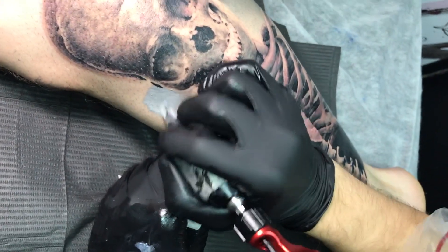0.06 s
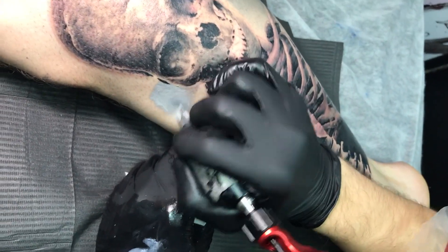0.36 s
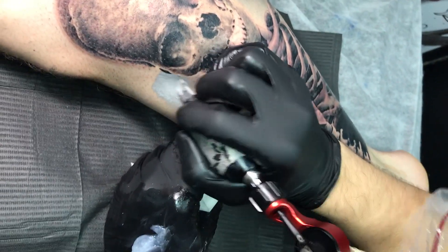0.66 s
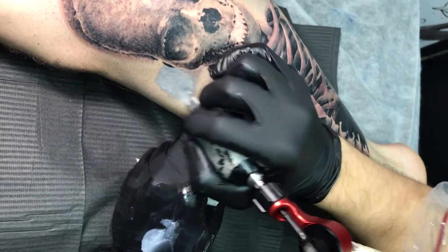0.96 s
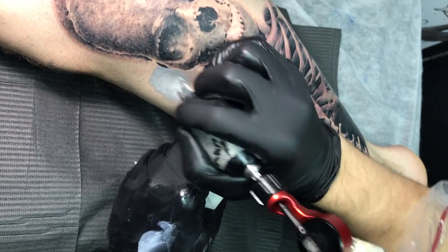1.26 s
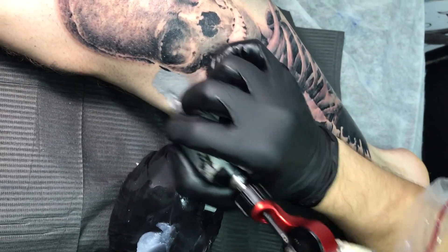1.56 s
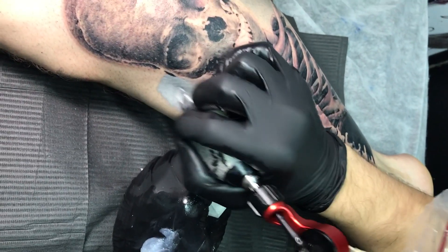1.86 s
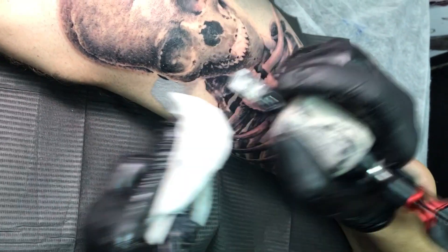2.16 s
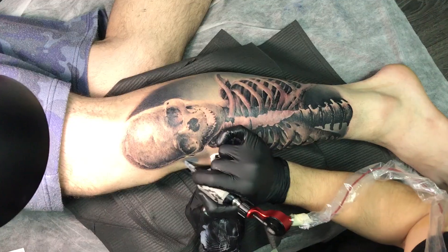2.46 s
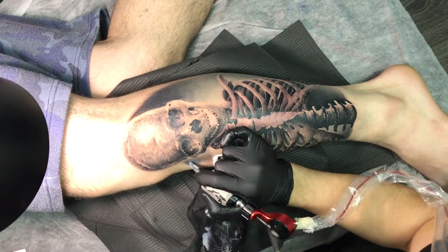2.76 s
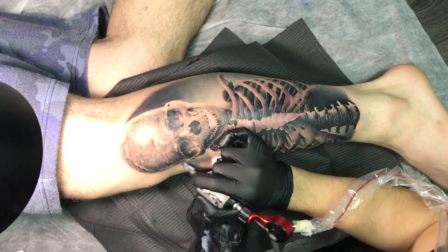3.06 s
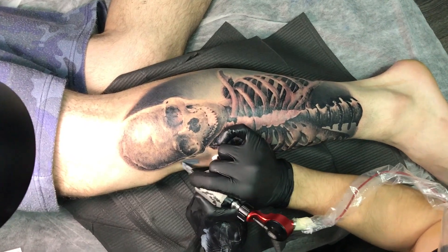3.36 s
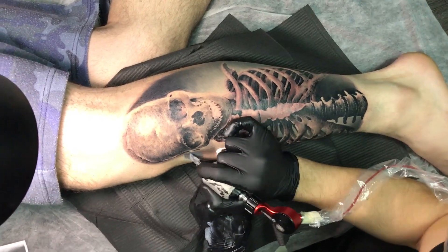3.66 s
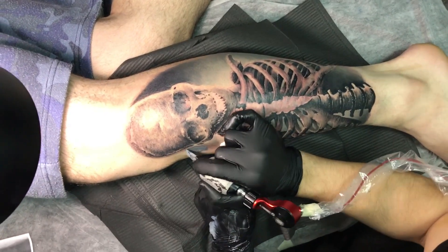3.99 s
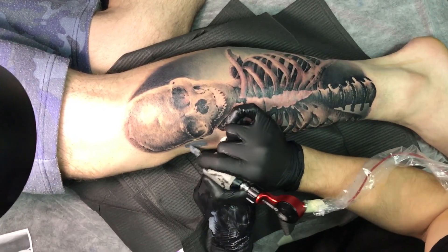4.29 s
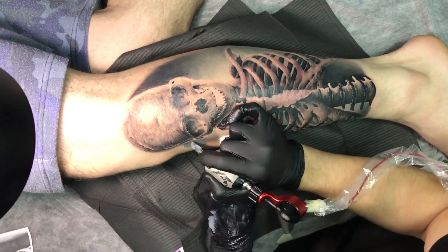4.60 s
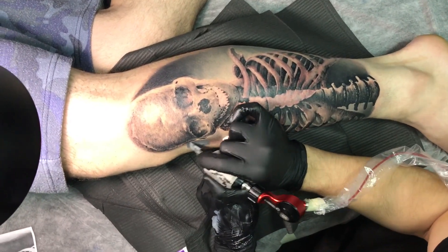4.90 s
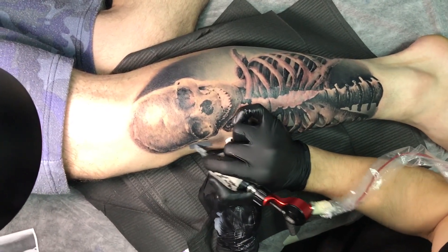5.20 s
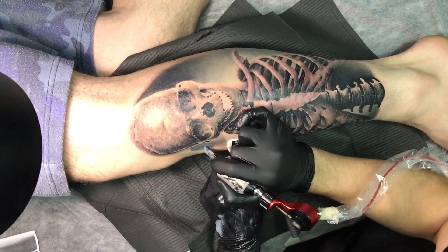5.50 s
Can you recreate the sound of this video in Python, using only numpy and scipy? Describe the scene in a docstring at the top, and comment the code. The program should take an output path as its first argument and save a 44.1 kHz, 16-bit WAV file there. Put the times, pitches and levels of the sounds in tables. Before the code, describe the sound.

A tattoo machine buzzes in short, rasping strokes, runs freely for a moment, then carries on from a little farther away.

```python
"""A rotary tattoo machine shades a leg in short strokes. Each turn of its cam (an off-centre wheel) rattles
the parts inside; each stroke slows the motor while the needle rasps in the skin and, early on, squeals.
After two seconds the machine is lifted and rings freely, then the sound breaks off for a moment.
The strokes go on, heard from farther away. Now and then a glove and a wipe brush the leg,
and a low room rumble lies under it all."""
import sys
import numpy as np
from scipy import signal
from scipy.fft import rfft, irfft, next_fast_len
from scipy.io import wavfile
from scipy.ndimage import uniform_filter1d, map_coordinates

SR = 44100
rng = np.random.default_rng(int(sys.argv[2]) if len(sys.argv) > 2 else 0)


def dump_mix(stems):
    """Bounce the given channels to the path in sys.argv[1] as a 16-bit WAV at rate SR."""
    frames = np.atleast_2d(stems).T  # one column per channel
    limited = np.clip(frames, -1, 1)  # hard clip at full scale
    pcm = np.round(limited * 32767).astype(np.int16)
    wavfile.write(sys.argv[1], SR, pcm)


N = 248724
TIME = np.arange(N) / SR
BREAK_START_S, BREAK_END_S = 2.341, 2.379
FAR = TIME > np.mean(BREAK_START_S + BREAK_END_S) / 2  # true once we listen from farther away

# Strokes over the skin. Each row: time of the heaviest load in seconds, drop in motor speed in Hz,
# how many seconds earlier the needle rasps, rasp level in dB.
STROKES = [(.121, 16.9, 0.047, -56.5), (.335, 16.2, .056, -56), (.54, 16.1, 0.048, -55.5),
           (.767, 16.7, 0.055, -54), (.974, 14.7, 0.041, -55.5), (1.18, 14.5, 0.053, -54.5),
           (1.377, 15.3, 0.042, -56), (1.57, 14.7, 0.036, -54.5), (1.786, 16.3, 0.033, -57),
           (2.001, 15.3, .043, -55.5), (2.484, 9.1, .03, -63), (2.719, 7.8, .043, -63),
           (2.945, 6.4, 0.043, -62), (3.171, 7.5, 0.054, -64.5), (3.409, 7.6, .058, -64.5),
           (3.625, 7.7, 0.062, -63.5), (3.839, 7.1, .049, -63.5), (4.067, 5.7, 0.059, -64),
           (4.295, 6.3, 0.069, -65), (4.53, 6.4, 0.07, -65), (4.769, 6.6, .089, -64),
           (5.007, 8.3, 0.064, -67.5), (5.237, 8.9, 0.061, -64.5), (5.477, 10.7, 0.055, -64),
           (5.689, 6.9, .045, -64.5)]


def rattle(turns, pressed, lifted):
    """Parts strike in the same order every turn, as hard as the load makes them, and ring the housing."""
    # The rows: needle bar sliding, housing knock, bar stop, needle entering, return slap, cam tick,
    # bearing whirr. Each row: place in the turn (0-1), decay in turns, pitch in Hz, half width in octaves,
    # then relative levels in dB for near and light, near and pressed, lifted, far and light, far and pressed.
    contacts = [(.13, 0.073, 13500, .55, -53.5, -62, -54.5, -57, -59.5),
                (.19, 0.083, 2620, 0.19, -47.5, -50, -70, -67, -72),
                (.34, 0.06, 9700, 0.83, -54.5, -50.5, -66, -58.5, -58.5),
                (0.512, 0.066, 4000, 1.66, -77, -54, -52, -58, -79),
                (0.788, 0.19, 2080, 0.5, -69, -53, -69, -76, -65.5),
                (.91, 0.077, 7280, 0.42, -51.5, -54.5, -53, -56, -57),
                (.05, 2.7, 1390, 4.2, -51, -51, -50.5, -53.5, -53)]
    total = np.zeros(N)
    for place, decay, centre, octaves, light_db, pressed_db, lifted_db, far_db, far_pressed_db in contacts:
        on_skin = amp(light_db + pressed * (pressed_db - light_db))
        near = (1 - lifted) * on_skin + lifted * amp(lifted_db)
        far = amp(far_db + pressed * (far_pressed_db - far_db))
        colour = lambda hz: band(hz, centre, octaves)
        loose = 0.14 + centre / 40000  # brighter contacts repeat less exactly
        bursts = chatter(turns - place, pressed, decay, colour, drift=0.056, loose=loose, scatter_db=0.94)
        width_gain = np.sqrt(np.mean(colour(np.arange(1, SR // 2)) ** 2))
        total += bursts * width_gain * np.where(FAR, far, near)
    total = steel_tube(total, pressed, lifted)
    total = filtered(total, lambda hz: 1 / np.sqrt(1 + (260 / hz) ** 2))  # a small body gives little bass
    return np.where(FAR, housing(total, far=True), housing(total, far=False))


def chatter(turns, pressed, decay, colour, drift, loose, scatter_db, size=512):
    """One burst of tiny hits a turn. Its pattern follows the load and drifts; a loose share is random."""
    turn, since = np.divmod(turns - np.floor(turns.min()), 1)
    turn = turn.astype(int)
    carry = 1 - drift  # how much of the pattern lives on into the next turn
    draws = rng.standard_normal((turn[-1] + 2, size))
    pattern, _ = signal.lfilter([np.sqrt(1 - carry ** 2)], [1, -carry], draws, axis=0, zi=carry * draws[-1:])
    # a burst keeps its own pace, so its tone colour stays put while the motor's pitch swings
    age_samples = since / np.gradient(turns)
    position = turn * size + age_samples
    light, heavy = (map_coordinates(p.ravel(), [position]) for p in (pattern, pattern[:, ::-1]))
    repeated = np.cos(np.pi / 2 * pressed) * light + np.sin(np.pi / 2 * pressed) * heavy
    grain = np.sqrt(1 - loose) * repeated + np.sqrt(loose) * rng.standard_normal(N)
    bursts = filtered(grain * np.exp(-since / (2 * decay)), colour)
    power = uniform_filter1d(uniform_filter1d(bursts ** 2, SR // 26), SR // 35)
    steady = bursts / np.sqrt(np.abs(power) + 1e-12)
    return steady * amp(scatter_db * wobble(100))


def steel_tube(x, pressed, lifted):
    """Grip and load shape how the tube rings; off the skin the knock softens and the treble opens up."""
    # The tube's top, high, middle and low ring. Each row: pitch in Hz, half width in octaves.
    tube_rings = [(13800, .18), (9400, 0.048), (6200, 0.071), (4000, .08)]
    # The fingers' damping. Each row: time in seconds, then the change of each of the four rings in dB.
    grip = [(0, -0.5, 1, -3, 0), (1.35, 1, 1.5, 1.5, 0), (2.05, -.5, 3, -1, 0.5), (2.2, 3, -3.5, 1, 0),
            (2.45, 2, -4.5, -5, -1.5), (3.3, 1, -3.5, -1.5, -1), (4.1, -0.5, 1, 0.5, 1),
            (5.6, -1, 2, 1.5, 5)]
    # From farther away, pressing the needle changes each of the four rings by this many dB.
    far_load_db = (-1.7, -0.5, 3.5, 0)
    times, *grip_db = np.transpose(grip)
    boost = lambda centre, octaves, db: (amp(db) - 1) * filtered(x, lambda hz: band(hz, centre, octaves))
    rings = sum(boost(centre, octaves, np.interp(TIME, times, db) + FAR * (pressed - .5) * load_db)
                for (centre, octaves), db, load_db in zip(tube_rings, grip_db, far_load_db))
    return x + rings + lifted * (boost(2650, .2, db=-6) + boost(14000, .3, db=3))


def housing(x, far):
    """The housing rings at its own pitches; in the hollows between them the rings cancel."""
    # Each row of both tables: pitch in Hz, width in Hz, near gain in dB, far gain in dB.
    housing_rings = [(600, 5200, -5.5, -8.5), (1125, 300, -0.5, -8), (1766, 160, -5.5, -1),
                     (2630, 375, 6.5, 2), (3070, 180, -5.5, -4.5), (4150, 830, 0.4, -5.5),
                     (6150, 750, -0.4, 0.2), (7150, 220, 3.5, -4), (8440, 450, 4.5, -1.5),
                     (9223, 550, 7, 7), (11160, 420, 0.5, 2), (11800, 480, 1, 1), (13200, 1900, 2.5, 1.5),
                     (14700, 1000, 1, -3)]
    housing_hollows = [(1930, 74, -1.5, -2.5), (3350, 150, 0, -4), (5050, 170, -2.5, -1.5),
                       (7640, 180, -3.5, -1.5), (10490, 320, -6.5, -4.5)]
    peaks, hollows = ([(centre, width, far_db if far else near_db) for centre, width, near_db, far_db in rows]
                      for rows in (housing_rings, housing_hollows))
    dips_db = lambda hz: sum(db * np.exp(-2 * ((hz - centre) / width) ** 2) for centre, width, db in hollows)
    return filtered(x, lambda hz: resonances(peaks, hz) * amp(dips_db(hz)), causal=True)


def motor_speed():
    """Turns a second: every stroke drags the motor down, and it recovers as the hand lets up."""
    # The motor with no load. Each row: time in seconds, turns a second.
    free_speed = [(2.06, 112.7), (2.17, 113), (2.355, 113.3), (2.365, 109.9), (5.64, 112.3)]
    press_s, release_s = np.where(FAR, .053, .0752), np.where(FAR, .0538, .0468)
    sag = sum(sag_hz * swell(s, np.where(TIME < s, press_s, release_s)) for s, sag_hz, _, _ in STROKES)
    return curve(free_speed) - sag


def needle_pressure(speed, near_bite_hz, far_bite_hz, soft_hz, inertia_s):
    """How hard the needle bites, 0-1; the rotor's inertia makes the speed lag behind the load."""
    acceleration = np.gradient(uniform_filter1d(speed, SR // 100)) * SR
    settled = speed + inertia_s * acceleration
    bite_hz = np.where(FAR, far_bite_hz, near_bite_hz)
    return (1 + np.tanh((bite_hz - settled) / soft_hz)) / 2


def needle_rasp(turns, pressed):
    """During each stroke the needle catches the skin once a turn."""
    # What rings in a stroke. Each row: pitch in Hz, width in Hz, delay in seconds, half length in seconds,
    # place in the turn (0-1), near gain in dB, far gain in dB.
    rasp_rings = [(3240, 920, -0.002, 0.036, .52, 1, 1), (1506, 190, 0.011, 0.032, .8, -8.5, -13),
                  (1130, 370, 0.012, 0.029, .8, -22, -7), (730, 210, 0.011, 0.03, .52, -13, -15),
                  (6500, 3300, 0.0048, 0.028, .52, -0.5, -5), (2430, 650, 0.04, 0.06, .8, -13.5, -4),
                  (6200, 380, 0.071, 0.024, 0.6, -15, -2), (14500, 6000, 0.026, 0.017, 0, 1.5, -16),
                  (11840, 340, 0.0084, 0.026, 0.4, -2, -18), (3930, 400, -0.079, 0.037, 0, -16, -6),
                  (1624, 150, -0.014, 0.019, .8, -29, -5.5), (9200, 1400, 0.13, .032, .34, -2, 0.5)]
    total = np.zeros(N)
    for centre, width, delay, half, place, near_db, far_db in rasp_rings:
        ring = lambda hz: resonances([(centre, width, 0)], hz) ** 2
        bursts = chatter(turns - place, pressed, decay=0.15, colour=ring, drift=0.1, loose=0.17, scatter_db=0.1)
        rasp_s, rasp_db = nearest_rasp(delay)
        total += bursts * swell(rasp_s + delay, half) * amp(rasp_db + np.where(FAR, far_db, near_db))
    return total


def nearest_rasp(delay):
    """For every sample, the time and level of the rasp that is closest once delayed by delay seconds."""
    heaviest_s, _, lead_s, rasp_db = np.transpose(STROKES)
    rasp_s = heaviest_s - lead_s
    midpoints = (rasp_s[1:] + rasp_s[:-1]) / 2
    stroke = np.searchsorted(midpoints + delay, TIME)
    return rasp_s[stroke], rasp_db[stroke]


def needle_squeal(turns, delay_s=.04, half_s=.039):
    """Just after each rasp the needle squeals against its tube, falling in pitch."""
    # Each row: seconds from the rasp, pitch in Hz.
    glide = [(-.03, 12170), (.008, 11380), (.07, 11100)]
    # The squeal fades over the first strokes. Each row: time in seconds, level in dB.
    fade = [(.7, -50), (1.33, -56), (1.6, -62), (3, -77)]
    rasp_s, _ = nearest_rasp(delay_s)
    tone = sine(np.interp(TIME - rasp_s, *np.transpose(glide)))
    sliding = np.exp(1.2 * np.cos(2 * np.pi * (turns - .3)))  # strongest once a turn
    roughness = noise(lambda hz: 1 / (1 + (hz / 300) ** 2))
    return unit(tone * sliding * roughness) * swell(rasp_s + delay_s, half_s) * amp(curve(fade))


def motor_hum(turns, pressed, lifted):
    """The unbalanced cam shakes the machine and, through the needle, the skin; the rotor whines above."""
    # Each row: multiple of the motor speed, near level in dB, far level in dB, change when pressed in dB.
    harmonics = [(1, -65, -75.5, -2), (2, -74.5, -84.5, 10.5), (3, -74, -86, 4.5), (4, -75, -93, 1),
                 (6, -75, -95, -3), (7, -90, -87.5, 9.5), (24, -74, -72.5, -6), (25, -63, -73, 0.5),
                 (26, -65.5, -80, 3)]
    total = np.zeros(N)
    for multiple, near_db, far_db, pressed_db in harmonics:
        db = np.where(FAR, far_db, near_db) + pressed_db * pressed + 1.14 * wobble(8)
        total += amp(db) * np.sin(2 * np.pi * (multiple * turns + rng.random()))
    return total * amp(-6 * lifted)


def free_ring(lifted):
    """Off the skin the motor runs evenly, and single steady tones stand out."""
    # Each row: pitch in Hz, relative level in dB.
    tones = [(1245, -68), (2148, -65), (2719, -72), (2826, -71), (3849, -72), (4301, -62.5), (4414, -67),
             (4753, -61.5)]
    ringing = sum(amp(db + 2.5 + 1.097 * wobble(20)) * np.sin(2 * np.pi * (hz * TIME + rng.random()))
                  for hz, db in tones)
    return lifted ** 2 * ringing


def squeak(at_s=1.56, half_s=.03, hz=1245, db=-63):
    """One brief, thin, slightly unsteady tone during a stroke."""
    return amp(db + 1.5 * wobble(40)) * swell(at_s, half_s) * np.sin(2 * np.pi * hz * TIME)


def glove_and_wipe():
    """Glove and wipe slide over the skin and nudge the padded bench, above a faint steady rustle."""
    # Each row: time in seconds, half length in seconds, rustle level in dB, dull thud level in dB.
    touches = [(.6, 0.063, -66, -76), (1.118, 0.11, -75, -63.5), (1.716, 0.075, -61.5, -76),
               (2.255, 0.065, -61, -78), (2.828, 0.024, -91, -74)]
    # The rustle's tone colour. Each row: frequency in Hz, gain in dB.
    rustle_colour = [(40, -31), (140, -2), (400, -1.5), (900, -3.5), (1400, -2), (2500, -8.5), (6000, -28)]
    rustle_level = sum(amp(db) * swell(s, half) for s, half, db, _ in touches) + amp(np.where(FAR, -77, -70.5))
    thud_level = sum(amp(db) * swell(s, half) for s, half, _, db in touches)
    points_hz, points_db = np.transpose(rustle_colour)
    rustle = noise(lambda hz: amp(np.interp(np.log(hz), np.log(points_hz), points_db)))
    thud = noise(lambda hz: band(hz, 123, 0.56))
    return rustle_level * rustle + thud_level * thud


def room_rumble(drone_hz=47.1, waver_hz=2.15, drone_db=-65, waver_db=3):
    """A low drone wavers and now and then swells, while the room booms at its lowest pitches."""
    # The drone's swells. Each row: time in seconds, half length in seconds, level in dB.
    surges = [(.62, .035, -59), (1.758, 0.035, -51.5), (2.431, 0.043, -57.5), (2.833, .03, -55),
              (3.398, .08, -62), (3.905, 0.065, -57), (4.12, .07, -61), (4.662, .06, -57.5),
              (4.989, 0.03, -59), (5.223, 0.035, -58), (5.45, .08, -63)]
    # The room's own pitches, near and far. Each row: pitch in Hz, width in Hz, relative level in dB.
    near_modes = [(67.1, 6.5, 6), (98, 11, -6.5), (158, 4.5, -11.5)]
    far_modes = [(74, 29, 7), (106, 5.4, 9.5), (151, 4.7, -22.5)]
    level = amp(drone_db + waver_db * wobble(12)) + sum(amp(db) * swell(s, half) for s, half, db in surges)
    drone = level * sine(drone_hz + waver_hz * wobble(31))
    near = amp(-63) * noise(lambda hz: resonances(near_modes, hz) * band(hz, 83, 2.6))
    far = amp(-68.5) * noise(lambda hz: resonances(far_modes, hz) * band(hz, 118, 3.9))
    return drone + np.where(FAR, far, near)


def amp(db):
    """Turn dB into a gain."""
    return 10 ** (np.asarray(db) / 20)


def unit(x):
    """Scale x to an average power of 1."""
    return x / np.sqrt(np.mean(x ** 2) + 1e-20)


def curve(rows):
    """Join (seconds, value) rows with straight lines."""
    return np.interp(TIME, *np.transpose(rows))


def swell(s, half):
    """A bell-shaped rise and fall around s seconds."""
    return np.exp(-np.minimum(((TIME - s) / half) ** 2 / 2, 20))


def wobble(rate):
    """A smooth curve through rate random points a second."""
    return map_coordinates(rng.standard_normal(int(N * rate / SR) + 4), [TIME * rate], mode="nearest")


def sine(hz):
    """A pure tone that follows a changing pitch."""
    return np.sin(2 * np.pi * np.cumsum(hz) / SR)


def noise(gain):
    """Noise of power 1, coloured by gain(hz)."""
    return unit(filtered(rng.standard_normal(N), gain))


def band(hz, centre, octaves):
    """Gain of a broad band around a centre."""
    return 1 / np.sqrt(1 + np.abs(np.log2(hz / centre) / octaves) ** 4)


def resonances(modes, hz):
    """Gain of a set of ringing peaks, each given as (pitch in Hz, width in Hz, dB)."""
    return np.sqrt(sum(amp(db) ** 2 / (1 + ((hz * hz - centre ** 2) / (hz * width)) ** 2)
                       for centre, width, db in modes))


def filtered(x, gain, causal=False):
    """Scale each frequency of x by gain(hz); a causal filter rings only after each blow."""
    size = 2 * next_fast_len((len(x) + SR // 4) // 2)
    response = gain(np.fft.rfftfreq(size, 1 / SR) + 1e-3)
    if causal:
        cepstrum = irfft(np.log(response + 1e-6), size)
        cepstrum[1:size // 2] *= 2
        cepstrum[size // 2 + 1:] = 0
        response = np.exp(rfft(cepstrum))
    return irfft(rfft(x, size) * response, size)[:len(x)]


def scene():
    """The motor's speed sets the needle's pressure, and both play the machine over the quieter sounds."""
    # The machine leaves the skin. Each row: time in seconds, how far it is lifted (0-1).
    lift = [(2.02, 0.04), (2.16, 0.8)]
    lifted = np.where(FAR, 0, curve(lift))
    speed = motor_speed()
    turns = np.cumsum(speed + .08 * wobble(60)) / SR
    pressed = needle_pressure(speed, near_bite_hz=100.24, far_bite_hz=106.92, soft_hz=1.4, inertia_s=0.017)
    machine = rattle(turns, pressed, lifted) + needle_rasp(turns, pressed) + needle_squeal(turns)
    machine += motor_hum(turns, pressed, lifted) + free_ring(lifted)
    return (machine + squeak() + glove_and_wipe() + room_rumble())[None]


def record(dry):
    """The sound almost vanishes between near and far, then returns; the highest treble is cut off."""
    floor_db, top_hz = -39, 15750
    audible = curve([(BREAK_START_S - .001, 1), (BREAK_START_S + .001, 0),
                     (BREAK_END_S - .003, 0), (BREAK_END_S + .007, 1)])
    return filtered(dry[0] * (audible + amp(floor_db)), lambda hz: hz < top_hz)[None]


dry = scene()
out = record(dry)
dump_mix(out)
```